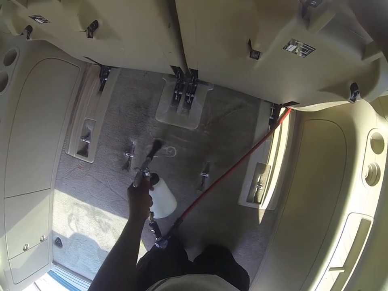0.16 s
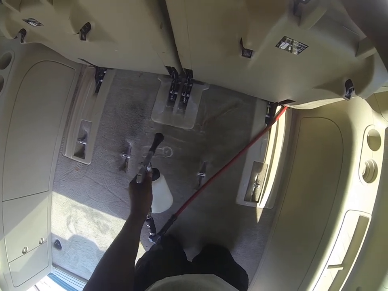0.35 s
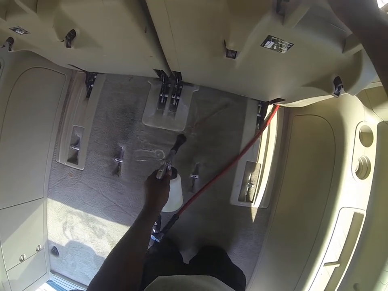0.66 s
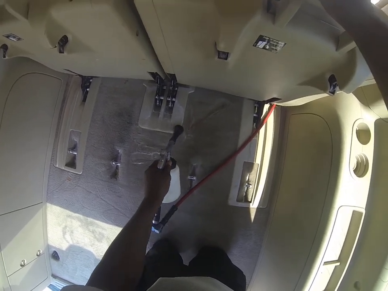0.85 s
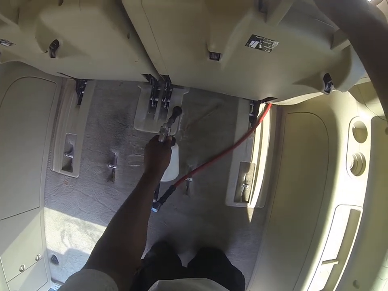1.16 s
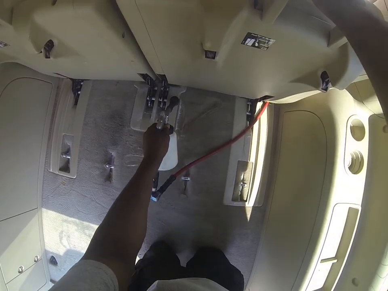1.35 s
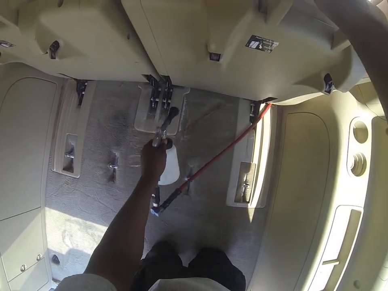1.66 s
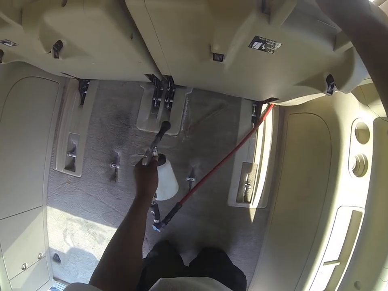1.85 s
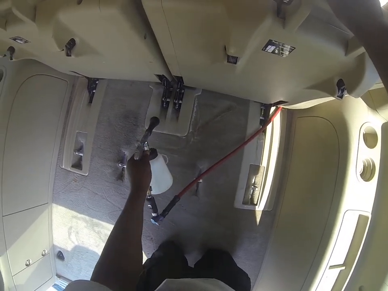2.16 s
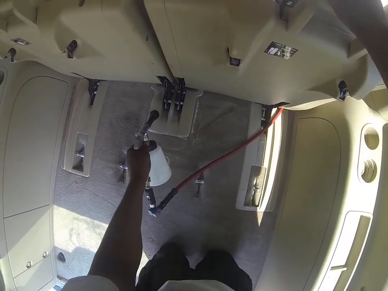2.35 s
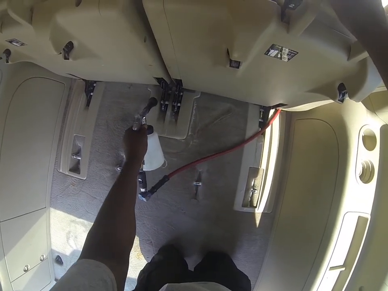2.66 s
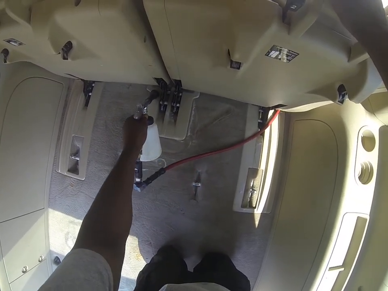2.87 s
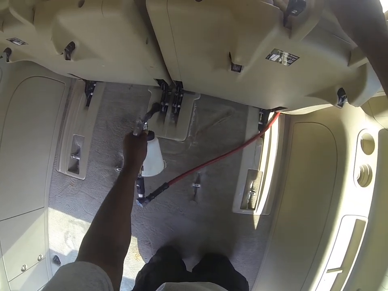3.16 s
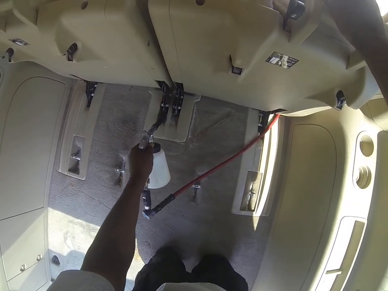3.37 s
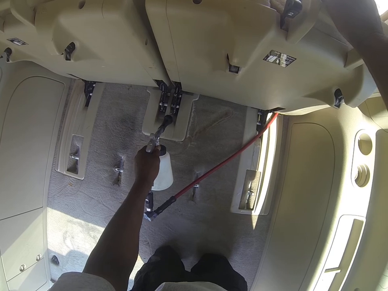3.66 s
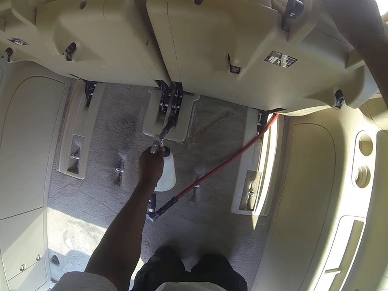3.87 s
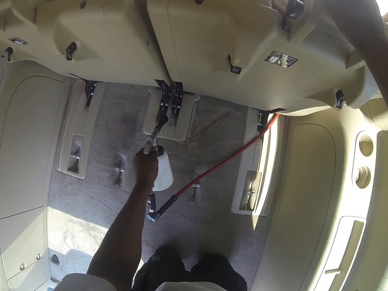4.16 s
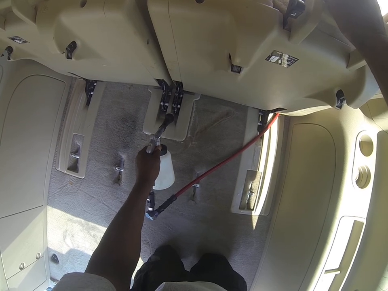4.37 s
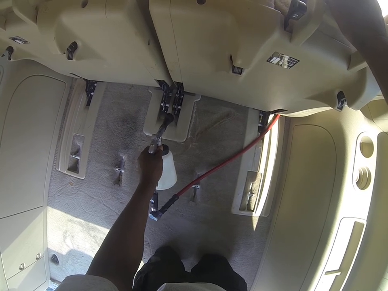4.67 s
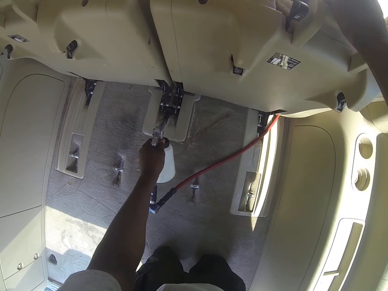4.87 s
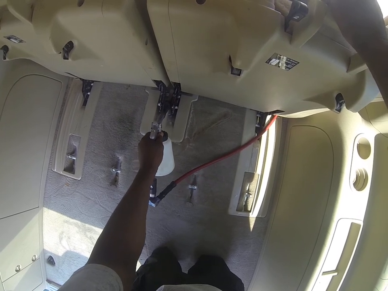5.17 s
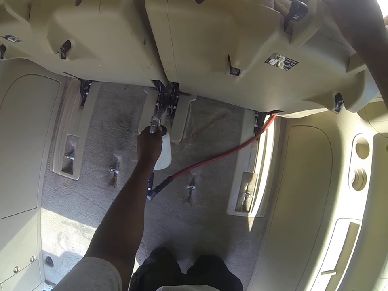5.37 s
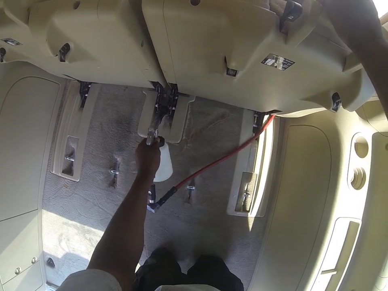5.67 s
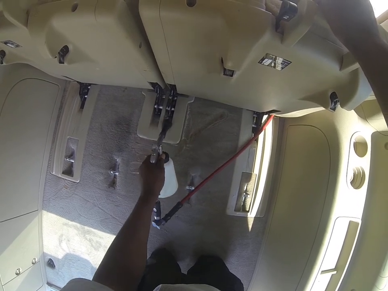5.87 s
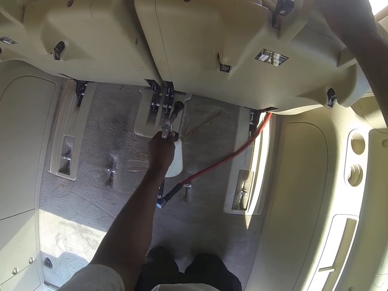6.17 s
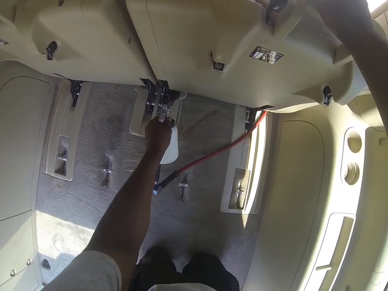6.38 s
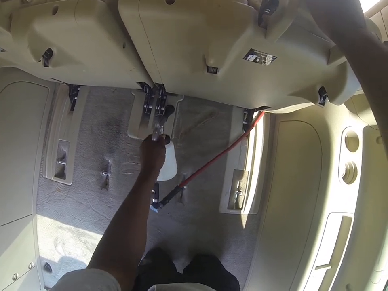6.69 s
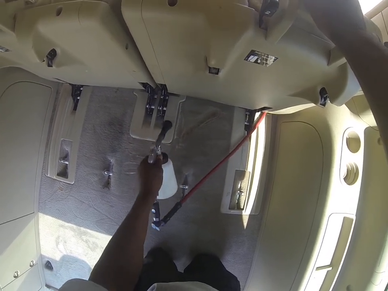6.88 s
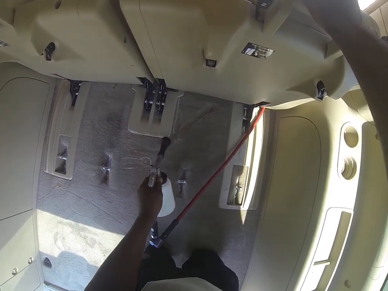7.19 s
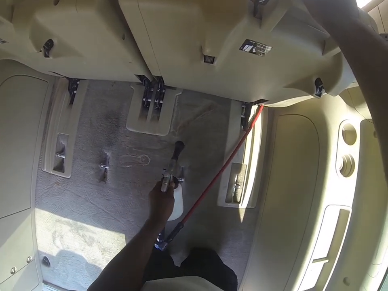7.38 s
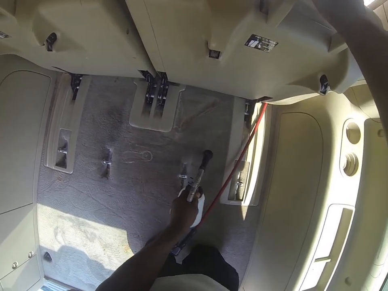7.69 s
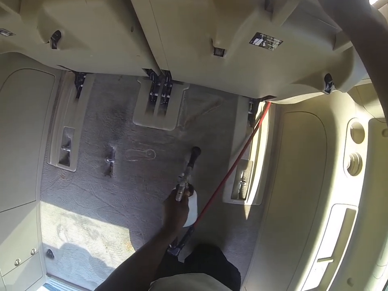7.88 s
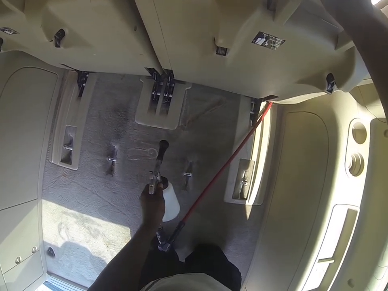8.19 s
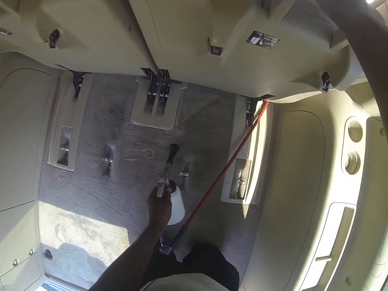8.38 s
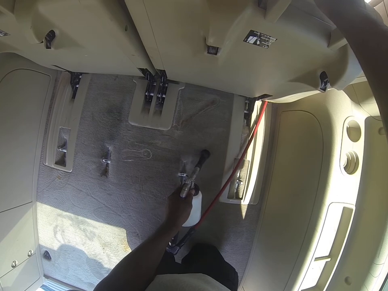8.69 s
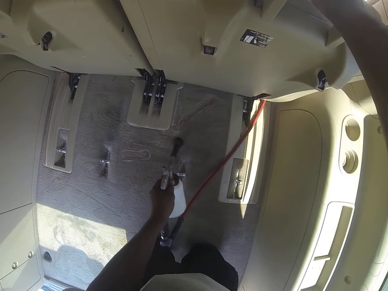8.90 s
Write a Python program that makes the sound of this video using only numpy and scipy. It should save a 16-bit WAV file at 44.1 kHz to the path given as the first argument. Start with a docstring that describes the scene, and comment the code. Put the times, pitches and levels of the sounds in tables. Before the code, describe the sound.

Close to the microphone, a pressurised air jet sprays bright, dense hiss with a nasal rotary buzz beneath it. Sharp whistles slide in and out, and the sound grows harsher around a bracket on the van floor. Soft scuffs brush the carpet. Three quick trigger releases leave a faint coasting whine and a distant engine-like drone before the blast resumes.

```python
"""Compressed-air cleaning gun in a van

The gun sweeps the carpet: a loud jet hiss of zoned noise, over a hum with buzzing overtones from a thin
tube that whirls in its cone about 250 times a second. Whistles lock some overtones; near a seat bracket
most of the hiss gets stronger. The trigger is let go three times and the tube coasts; brushing the carpet
slows it and scuffs. A machine, a sum of shaky tones, drones outside over a faint rush.
"""
import sys
import numpy as np
from scipy.fft import rfft, irfft, next_fast_len
from scipy.io import wavfile
from scipy.ndimage import map_coordinates

SR = 44100
rng = np.random.default_rng(int(sys.argv[2]) if len(sys.argv) > 2 else 0)


def generate_wav(sig):
    """Save sig (samples, or channels by samples) to the path in sys.argv[1] as 16-bit PCM at SR."""
    pcm = np.round(np.clip(np.atleast_2d(sig).T, -1, 1) * 32767).astype(np.int16)
    wavfile.write(sys.argv[1], SR, pcm)


N = 398663

# trigger pauses: released t/s, pressed again t/s
PAUSES = [(.069, .222), (5.821, 5.889), (7.059, 7.174)]
# tube brushes the carpet: middle t/s, length/s, speed lost/(turns/s), scuff level/dB
BRUSHES = [(2.0, .18, 11.1, -48.5), (3.454, 0.15, 11.4, -48), (5.94, 0.074, 0.38, -41.5),
           (6.355, 0.076, 2.8, -48)]


def amp(db):
    """Decibels to gain."""
    return 10 ** (np.asarray(db) / 20)


def unit(x):
    """Scale to rms 1."""
    return x / np.sqrt(np.mean(x ** 2) + 1e-20)


def along(points, hz):
    """Interpolate (f/Hz, value) points on a log frequency axis."""
    f, v = np.transpose(points)
    return np.interp(np.log(hz + 1), np.log(f + 1), v)


def curve(points):
    """Interpolate (t/s, value) points to one value per sample."""
    t, v = np.transpose(points)
    return np.interp(np.arange(N) / SR, t, v)


def wobble(knots_per_s):
    """Smooth random curve: a spline through normal draws, computed every 32 samples."""
    n = np.arange(N)
    coarse = n[::32]
    knots = rng.standard_normal(int(N * knots_per_s / SR) + 4)
    return np.interp(n, coarse, map_coordinates(knots, [coarse * knots_per_s / SR]))


def swell(middle_s, length_s):
    """Bell 0-1 in time that stays above one half for its length."""
    bell = np.zeros(N)
    first = max(int((middle_s - 2 * length_s) * SR), 0)
    last = min(int((middle_s + 2 * length_s) * SR), N)
    n = np.arange(first, last)
    bell[n] = .5 ** ((2 * (n / SR - middle_s) / length_s) ** 2)
    return bell


def filtered(x, response):
    """x times a response of frequency."""
    m = next_fast_len(N + SR // 2)
    return irfft(rfft(x, m) * response(np.fft.rfftfreq(m, 1 / SR)), m)[:N]


def band(x, lo_hz, hi_hz, order=20):
    """The part of x between two soft edges; neighbouring bands add up to x."""
    def below(hz, edge_hz):
        return 1 / (1 + (hz / edge_hz) ** order)
    return filtered(x, lambda hz: below(hz, hi_hz) - below(hz, lo_hz))


def order_tone(angle, order, shimmer, knots_per_s, drift_rad=0):
    """One order of a rotation: random in-phase and quadrature shake, plus a slow phase drift."""
    phase = order * angle + rng.uniform(0, 2 * np.pi) + drift_rad * wobble(7)
    in_phase = (1 + shimmer * wobble(knots_per_s)) * np.cos(phase)
    quadrature = shimmer * wobble(knots_per_s) * np.sin(phase)
    return np.sqrt(2) * (in_phase + quadrature)


def outside(floor_db=-51):
    """A machine drones as a sum of shaky tones over the yard's faint rush of filtered noise."""
    # machine tones: f/Hz, level/dB
    drone_tones = [(39.7, -47.5), (50.3, -76), (55, -49), (60, -54.5), (125, -69)]
    # rush spectrum: f/Hz, level/dB
    rush_spectrum = [(15, -4.5), (32, -7), (75, -1.5), (130, -3.5), (250, -10), (600, -14), (1800, -25),
                     (3000, -17), (15000, -31)]
    t = np.arange(N) / SR
    drone = sum(amp(db) * order_tone(2 * np.pi * hz * t, order=1, shimmer=0.22, knots_per_s=6)
                for hz, db in drone_tones)
    rush = filtered(rng.standard_normal(N), lambda hz: amp(along(rush_spectrum, hz)))
    return drone + amp(floor_db) * unit(rush)


def valve(bleed_s=0.011, tail_db=-19, tail_s=0.029, opening_s=.0085):
    """Air flow 0-1: pressure bleeds off fast on release, then with a faint tail; it snaps back on the press."""
    t, flow = np.arange(N) / SR, np.ones(N)
    for released_s, pressed_s in PAUSES:
        since_s = np.maximum(t - released_s, 0)
        closing = np.maximum(np.exp(-since_s / bleed_s), amp(tail_db) * np.exp(-since_s / tail_s))
        opening = np.clip((t - pressed_s) / opening_s + .5, 0, 1)
        flow *= np.maximum(closing, opening)
    return flow


def drag():
    """Turns per second that the carpet takes from the tube."""
    return sum(lost * swell(s, length_s) for s, length_s, lost, _ in BRUSHES)


def spin(coast_s=.66, spin_up_s=.118, spin_up_shape=1.35):
    """Turns per second: the tube coasts down in a pause, spins up after it, and drags where it brushes."""
    # under full air, touching nothing: t/s, speed/(turns/s)
    free_spin = [(0, 249.5), (1.1, 250.3), (2.25, 249), (3.25, 250.5), (4.1, 249), (4.35, 251.5),
                 (4.62, 251.5), (4.75, 249), (5.5, 249.3), (5.8, 251), (7.0, 250), (8.3, 252)]
    t, speed = np.arange(N) / SR, curve(free_spin)
    for released_s, pressed_s in PAUSES:
        lost = 1 - np.exp(-np.clip(t - released_s, 0, pressed_s - released_s) / coast_s)
        remaining = np.exp(-(np.maximum(t - pressed_s, 0) / spin_up_s) ** spin_up_shape)
        speed = speed * (1 - lost * remaining)
    return speed - drag()


def scuffs():
    """A low, breathy rasp of filtered noise wherever the tube brushes the carpet."""
    # scuff spectrum: f/Hz, level/dB
    scuff_spectrum = [(200, -24), (380, -7), (470, -1), (660, -4), (850, -8), (1200, -12), (2000, -25),
                      (6000, -60)]
    level = sum(amp(db) * swell(s, length_s) for s, length_s, _, db in BRUSHES)
    return level * unit(filtered(rng.standard_normal(N), lambda hz: amp(along(scuff_spectrum, hz))))


def whine(angle, flow, eighth_order_db=-59):
    """With the air off, the coasting tube whines faintly on three even orders."""
    tones = sum(order_tone(angle, order=k, shimmer=.25, knots_per_s=70) * k / 8 for k in (4, 6, 8))
    return amp(eighth_order_db) * (1 - flow) * tones


def cone_db(hz):
    """How strongly cone and nozzle pass each frequency: a smooth slope plus resonances and notches."""
    # smooth jet spectrum: f/Hz, level/dB
    air_spectrum = [(100, -10), (350, -25), (650, -17), (1000, -8.5), (1330, -17), (1480, 0), (2100, -5),
                    (2550, -3.5), (3600, -9.5), (4300, -8), (8400, -6), (8900, -13), (12500, -13.5),
                    (15200, -19.5)]
    # resonances and notches: f/Hz, width/Hz, level/dB
    resonances = [(851, 150, 5), (920, 97, -14), (1710, 100, 3), (2085, 52, 6), (2638, 200, -7.5),
                  (2976, 90, 4), (3338, 147, 7), (3944, 210, 4.5), (4230, 250, 4.5), (5220, 316, 7),
                  (5890, 300, 2), (6550, 280, -4.5), (6600, 280, 5), (7380, 270, -4.5), (7530, 340, 3.5),
                  (8320, 270, 1.5), (11920, 940, 2.5), (13650, 600, -0.5)]
    peaks_db = sum(db / (1 + (2 * (hz - centre_hz) / width_hz) ** 4)
                   for centre_hz, width_hz, db in resonances)
    return along(air_spectrum, hz) + peaks_db


def whistles():
    """Gains of the second, sixth and seventh order where the cone catches a whistle on them."""
    # middle t/s, length/s, second order level/dB, sixth order level/dB, seventh order level/dB
    whistle_rows = [(1.13, .12, -57, -33, -34), (1.286, 0.17, -59, -33.5, -29.5),
                    (1.822, 0.084, -34.5, -37, -43), (2.23, 0.14, -39, -29.5, -50),
                    (3.033, 0.42, -73, -37, -31.5), (3.24, .1, -34, -31, -41),
                    (3.516, 0.16, -37.5, -21, -23.5), (3.93, 0.12, -45, -28.5, -49),
                    (4.144, 0.097, -33, -20, -26), (4.323, 0.097, -37, -21, -18.5),
                    (4.593, 0.15, -39, -21.5, -23.5), (4.941, 0.043, -40, -25, -48),
                    (5.093, 0.15, -44, -27.5, -40), (5.374, 0.13, -44, -28, -45),
                    (5.542, 0.078, -52, -26, -42), (5.804, 0.19, -39, -27, -31),
                    (5.95, 0.065, -36, -39, -47), (6.703, .08, -50, -35, -42),
                    (6.867, 0.1, -42, -36, -34.5)]
    return sum(np.outer(amp(levels_db), swell(s, length_s)) for s, length_s, *levels_db in whistle_rows)


def tone_gains(flares, sixth_db=1, seventh_db=-8.5, third_flare_db=-20, twelfth_db=-11.5, fade_db=3.0):
    """Leading order gains: brushing damps low ones, sixth follows second, seventh the roar, whistles add."""
    # levels of first, second and third order and of the cone's roar: t/s, level/dB
    hum_db, second_db = curve([(0.03, -45.5), (1.19, -44.0), (2.27, -41.5), (3.07, -44.0), (3.23, -38),
                               (4.27, -48), (4.39, -42), (6.11, -46), (6.31, -39.5), (6.95, -46.5),
                               (7.67, -41.5), (9.03, -44.5)]), curve([(0.03, -48.5), (0.72, -56.5), (0.88, -48.5), (1.75, -44),
                                                   (2.38, -38.5), (2.5, -50), (3.05, -59), (3.17, -39.5),
                                                   (3.6, -33.5), (4.68, -34), (4.87, -46), (5.03, -35.5),
                                                   (5.15, -44), (5.28, -39), (5.79, -38), (6.05, -53.5),
                                                   (6.85, -42), (7.001, -52), (9.03, -53)])
    third_db, roar_db = curve([(0.03, -36.5), (0.42, -48.5), (0.85, -45), (0.95, -37), (1.38, -39),
                               (1.55, -47.5), (3.1, -47.5), (3.23, -52.5), (3.45, -35), (3.85, -51.5),
                               (4.78, -43.5), (5.35, -58), (6.25, -47), (7.7, -55), (9.03, -47.5)]), curve([(0.03, -37), (0.39, -35.5), (1.03, -35.5), (1.11, -33),
                                                     (2.35, -36), (3.43, -30), (3.95, -31), (5.07, -29),
                                                     (5.47, -34), (5.75, -27), (6.03, -37), (6.63, -32),
                                                     (7.35, -37.5), (7.47, -36.5), (8.63, -37.5),
                                                     (9.03, -37)])
    # whistle overblows to the twelfth order: middle t/s, length/s, level/dB
    squeals = [(3.56, 0.089, -28), (4.18, 0.11, -25), (4.32, .07, -30)]
    hum_damping, second_damping = 0.9, 0.6  # dB per turn/s lost
    flare_second, flare_sixth, flare_seventh = flares
    lost = drag()
    sixth = np.hypot(amp(second_db + sixth_db + fade_db * wobble(9)), flare_sixth)
    squeal = sum(amp(db) * swell(s, length_s) for s, length_s, db in squeals)
    return {"hum": amp(hum_db - hum_damping * lost),
            "second": np.hypot(amp(second_db - second_damping * lost), flare_second),
            "third": np.hypot(amp(third_db), amp(third_flare_db) * flare_sixth),
            "sixth": sixth,
            "seventh": np.hypot(amp(roar_db + seventh_db + fade_db * wobble(9)), flare_seventh),
            "twelfth": np.hypot(amp(twelfth_db) * sixth, squeal)}


def tube(angle, speed, flow, coast_db=-14, lock_db=-29, hum_fade_db=1.1):
    """The whirling tube hums, weaker when slow; overtones glide through cone resonances, whistles lock them."""
    # order, name of level followed, level against it/dB, random fading/dB
    overtones = [(2, "second", -.7, 2.7), (3, "third", -0.2, 1.8), (4, "second", -6, 2.4),
                 (5, "hum", -14, 2), (5, "sixth", -16, 2), (6, "sixth", 1.4, -0.3),
                 (7, "seventh", 1.4, 1.8), (8, "sixth", -13, 7), (8, "hum", -4, 5), (9, "sixth", -16, 1.5),
                 (10, "sixth", -16, 1), (11, "sixth", -15.5, 0.5), (12, "twelfth", -0.6, 1.1)]
    slowing_db = 45  # per e-fold of speed
    tuning = 0.97  # share of the cone's resonance felt in a glide
    shimmer_per_order, drift_rad_per_order = 0.083, 0.073
    flares = whistles()
    gains, usual = tone_gains(flares), np.median(speed)
    grid_hz = np.arange(SR // 8)
    colour_db = cone_db(grid_hz)
    hum_tone = order_tone(angle, order=1, shimmer=0.028, knots_per_s=40)
    hum = gains["hum"] * amp(hum_fade_db * wobble(13)) * hum_tone
    buzz = np.zeros(N)
    rough = shimmer_per_order / (1 + flares[1] / amp(lock_db))  # smoother as the sixth order whistles
    for order, name, db, fade_db in overtones:
        ring_db = np.interp(order * speed, grid_hz, colour_db) - np.interp(order * usual, grid_hz, colour_db)
        gain = gains[name] * amp(db + tuning * ring_db + fade_db * wobble(10))
        buzz += gain * order_tone(angle, order, shimmer=rough * order, knots_per_s=65,
                                  drift_rad=drift_rad_per_order * order)
    return amp(slowing_db * np.log(speed / usual)) * (hum + np.maximum(flow, amp(coast_db)) * buzz)


def panels(x, echo_db, sway_ms, knots_per_s, count=7):
    """Echoes off nearby trim; their delays drift as the gun moves, sweeping combs through the hiss."""
    n, out = np.arange(N), x.copy()
    for delay_ms in np.geomspace(.7, 7, count):
        lag = (delay_ms + sway_ms * wobble(knots_per_s)) * SR / 1000
        out += amp(echo_db) * np.interp(n - lag, n, x)
    return out


def zone_gains(flow, wander_db=0.6, surge_s=0.1):
    """Gain of each jet zone: shifts at the bracket, flares in squalls, surges as stored pressure is spent."""
    # level followed, level against it/dB, bracket lift/dB, share of a squall,
    # surge per unit force/dB, left in the pauses/dB
    zones = [("hiss", -25, 1.3, 0.044, 4, -24), ("roar", 1.17, 0.94, 0.05, 1, -21.5),
             ("hiss", -12, 4.3, 1, 1.9, -30), ("hiss", -4, -.5, 1.08, 3, -25),
             ("hiss", -4.5, -0.27, 0.1, 2.2, -25), ("mist", 0.092, 0.1, 0.05, 3.1, -24)]
    # jet strikes an edge and turns harsh: middle t/s, length/s, level/dB
    squalls = [(5.0, 0.2, 3.5), (5.145, 0.24, 4), (5.695, 0.16, 6.5), (6.584, .15, 3)]
    # surge force of each press
    press_force = [1.9, 1.5, 0.47]
    # levels of roar, hiss and top treble: t/s, level/dB
    level_db = {"roar": curve([(0.03, -37), (0.39, -35.5), (1.03, -35.5), (1.11, -33), (2.35, -36),
                               (3.43, -30), (3.95, -31), (5.07, -29), (5.47, -34), (5.75, -27), (6.03, -37),
                               (6.63, -32), (7.35, -37.5), (7.47, -36.5), (8.63, -37.5), (9.03, -37)]), "hiss": curve([(0.03, -29.0), (0.43, -24.0), (1.03, -26),
                                                            (2.11, -25.5), (2.31, -23.0), (2.47, -26.5),
                                                            (2.83, -29), (3.31, -23), (3.75, -23.0),
                                                            (3.87, -25.5), (4.03, -23.5), (5.59, -22.5),
                                                            (6.03, -28), (6.15, -24.5), (6.27, -26),
                                                            (8.67, -23), (8.83, -27.5), (9.03, -24)]), "mist": curve([(0.03, -42),
                                                                                         (0.39, -36),
                                                                                         (2.11, -31.0),
                                                                                         (2.99, -35.5),
                                                                                         (3.75, -32.0),
                                                                                         (6.55, -35.5),
                                                                                         (6.91, -32),
                                                                                         (7.27, -36.5),
                                                                                         (7.63, -31.5),
                                                                                         (8.27, -37.5),
                                                                                         (8.67, -31.5),
                                                                                         (9.03, -36.5)])}
    bracket_from_s, bracket_to_s, bracket_ramp_s = 2.66, 5.97, .12
    t = np.arange(N) / SR
    bracket = np.clip(np.minimum(t - bracket_from_s, bracket_to_s - t) / bracket_ramp_s + .5, 0, 1)
    squall_db = sum(db * swell(s, length_s) for s, length_s, db in squalls)
    surge = sum(force * (t > pressed_s) * np.exp(-np.abs(t - pressed_s) / surge_s)
                for (_, pressed_s), force in zip(PAUSES, press_force))
    gains = []
    for name, db, lift_db, share, surge_db, left_db in zones:
        zone_db = level_db[name] + db + lift_db * bracket + share * squall_db + surge_db * surge
        gains.append(np.maximum(flow, amp(left_db)) * amp(zone_db + wander_db * wobble(7)))
    return gains


def jet(angle, flow, swirl=0.075, flutter_db=.5):
    """Turbulent air and spray: noise coloured by the cone, swung once a turn; a little is left in pauses."""
    # zone edges: f/Hz
    edges_hz = [200, 1200, 2300, 3700, 5600, 9000, 15300]
    air = panels(rng.standard_normal(N), echo_db=-14.5, sway_ms=0.076, knots_per_s=2.5)
    air = filtered(air, lambda hz: amp(cone_db(hz)))
    sound = sum(gain * unit(band(air, lo_hz, hi_hz))
                for gain, lo_hz, hi_hz in zip(zone_gains(flow), edges_hz, edges_hz[1:]))
    return sound * (1 + swirl * np.cos(angle)) * amp(flutter_db * wobble(130))


def scene():
    """One rotation drives hum and hiss; both channels hear the same."""
    speed = spin()
    jitter = 1 + 0.00355 * wobble(30)
    angle = 2 * np.pi * np.cumsum(speed * jitter) / SR
    flow = valve()
    mono = outside() + scuffs() + whine(angle, flow) + tube(angle, speed, flow) + jet(angle, flow)
    return np.array([mono, mono])


def record(dry, top_hz=15290):
    """Band limit: nothing passes from top_hz up."""
    return np.array([filtered(x, lambda hz: hz < top_hz) for x in dry])


dry = scene()
out = record(dry)
generate_wav(out)
```